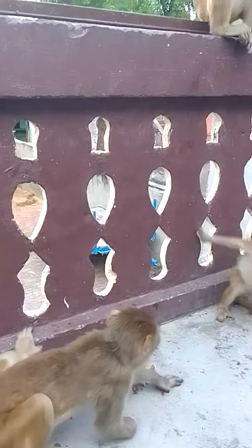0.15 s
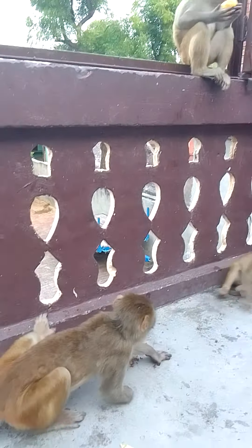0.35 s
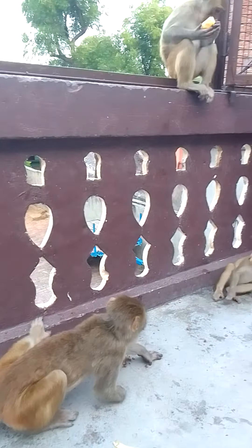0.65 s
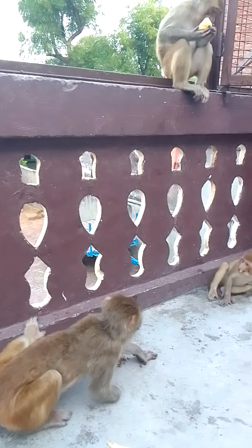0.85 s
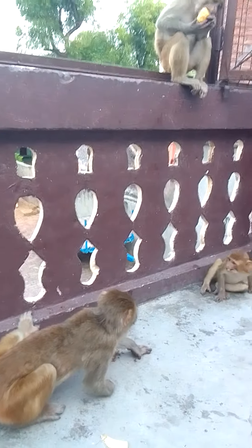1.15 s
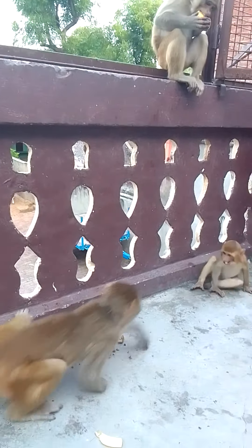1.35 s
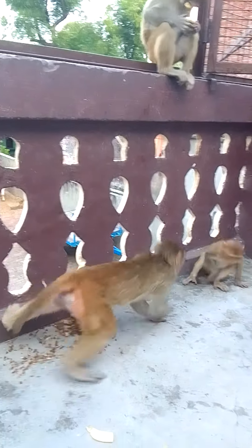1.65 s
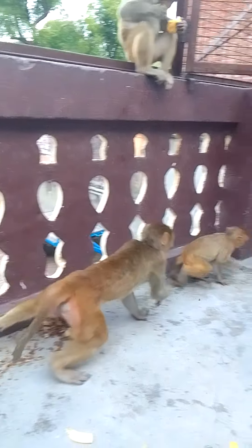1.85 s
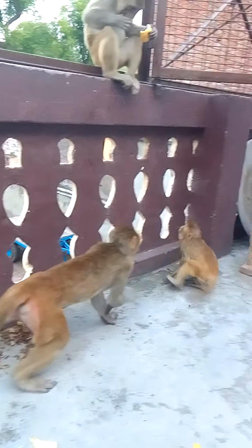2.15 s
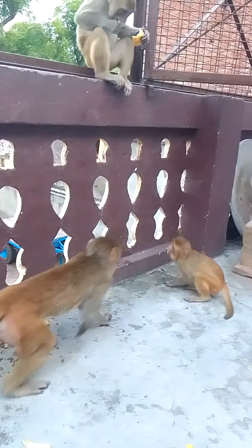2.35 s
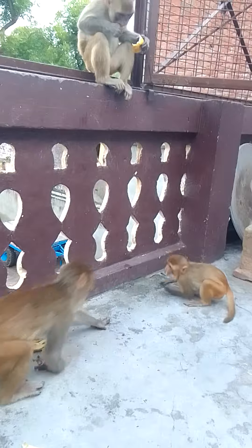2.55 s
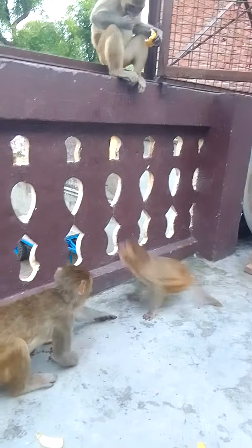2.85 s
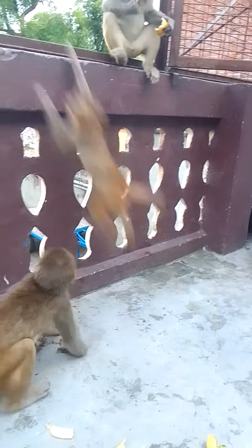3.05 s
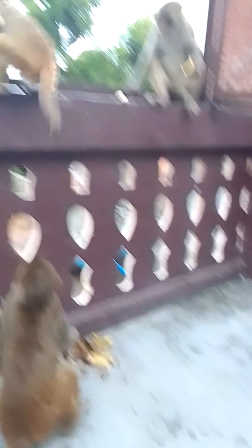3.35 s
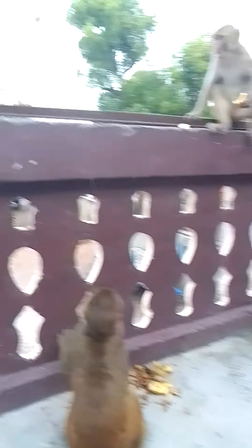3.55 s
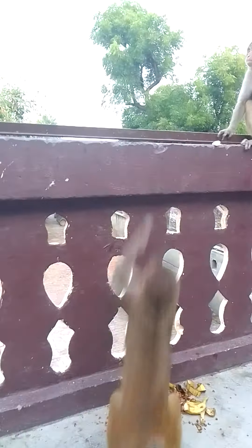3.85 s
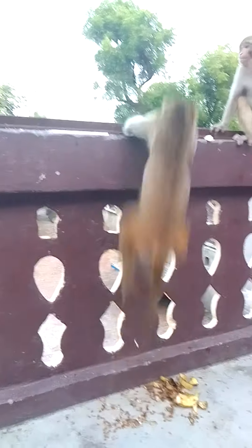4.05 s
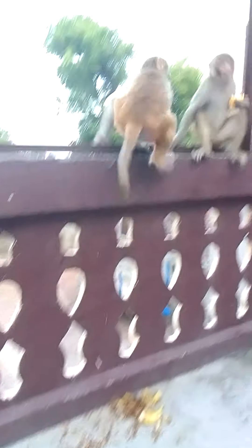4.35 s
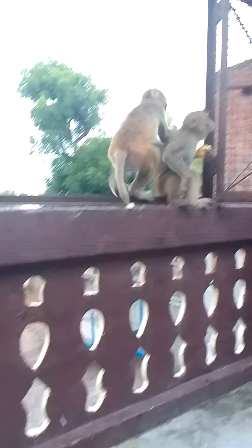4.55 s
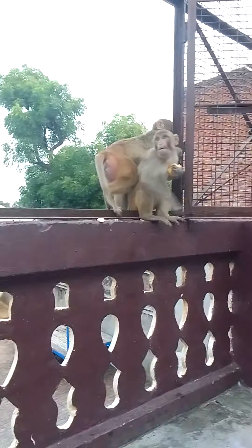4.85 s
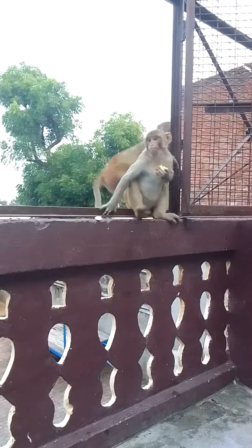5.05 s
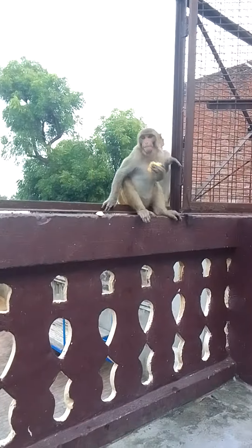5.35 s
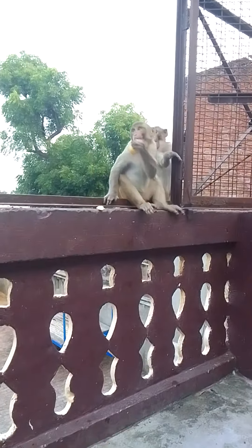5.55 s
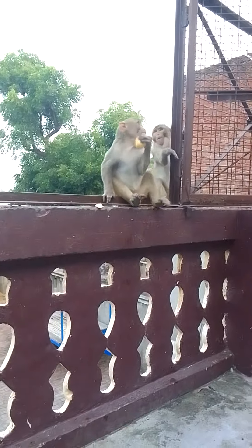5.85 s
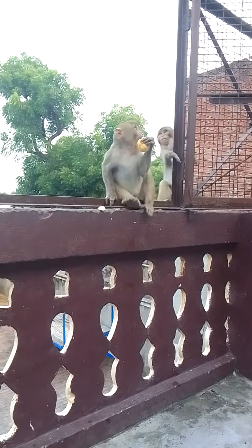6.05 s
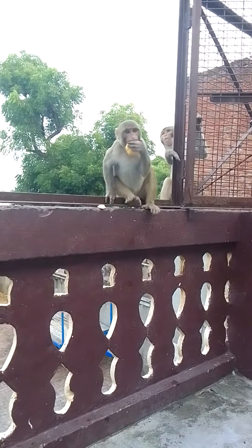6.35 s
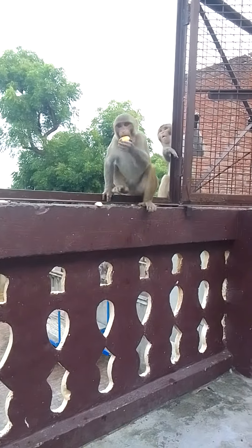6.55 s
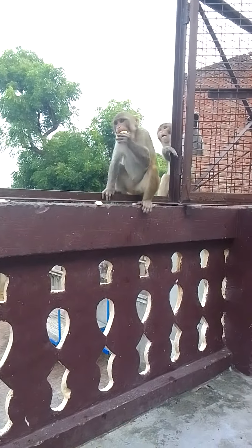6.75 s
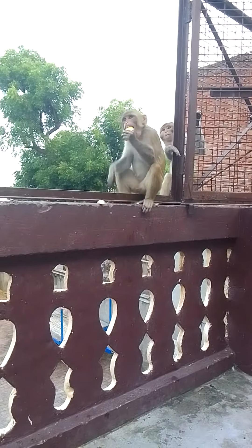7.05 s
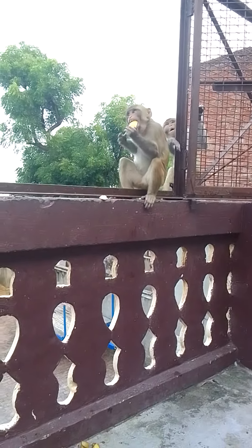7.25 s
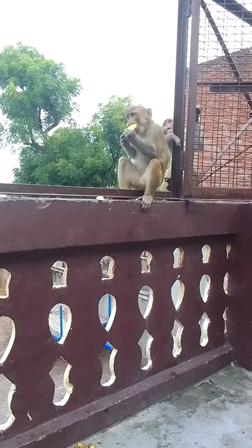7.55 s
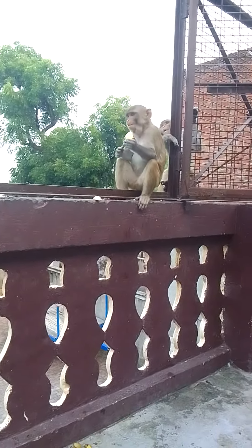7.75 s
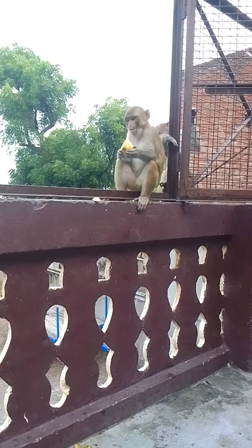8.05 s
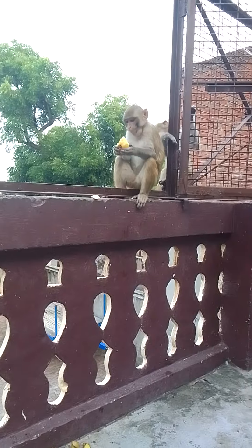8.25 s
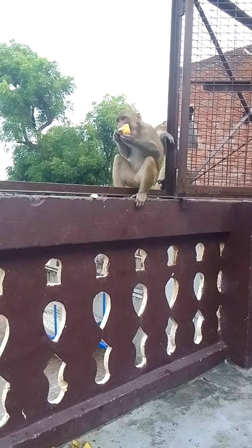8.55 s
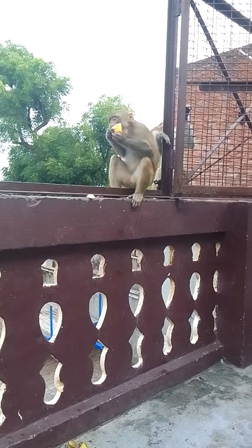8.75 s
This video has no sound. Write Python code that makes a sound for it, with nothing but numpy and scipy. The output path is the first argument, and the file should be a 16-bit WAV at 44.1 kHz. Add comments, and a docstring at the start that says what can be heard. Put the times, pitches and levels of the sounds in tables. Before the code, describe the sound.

On a walled concrete terrace, a faint soft call and tiny dry clicks come first. From about two seconds monkeys give short clear squeaks, then a rapid run of harsh, noisy screeches, with rough low crackle and pops as they scramble and jump. Later squeals come in scattered clusters with gaps, slapping back off the walls. A low grunt and chirps end it abruptly. Handheld microphone, faint uneven hum.

```python
"""Monkey quarrel on a walled terrace

Monkeys quarrel over food on concrete: clear squeaks (overtone stacks) break into harsh screeches
(noise and jumping whistles in five throat modes). A low crackle of one-sided snaps joins in while
they scramble and jump; small ticks, faint notes and a background hum of shaped noise lie around them.
The walls throw calls and ticks back as slaps and a fading tail; the sound stops dead near the end."""
import sys
import numpy as np
from scipy import signal
from scipy.io import wavfile
from scipy.ndimage import uniform_filter1d

SR = 44100
rng = np.random.default_rng(int(sys.argv[2]) if len(sys.argv) > 2 else 0)


def bounce(signal):
    """Save signal as a 16-bit WAV file at the path given by the first command-line argument."""
    frames = np.transpose(np.atleast_2d(signal))
    limited = np.clip(frames, -1, 1)
    pcm = np.round(limited * 32767).astype(np.int16)
    wavfile.write(sys.argv[1], SR, pcm)


N = 392931


def amp(db):
    """Decibels to linear gain."""
    return 10 ** (np.asarray(db) / 20)


def evened(x):
    """Scales a signal to an rms of 1."""
    return x / np.sqrt(np.mean(x ** 2) + 1e-20)


def read(points, hz):
    """Reads a curve of (frequency, value) points along a log frequency axis."""
    point_hz, value = np.transpose(points)
    return np.interp(np.log(hz + 1), np.log(point_hz + 1), value)


def add(mix, start_s, sound):
    """Lays a sound into the mix in place, trimmed at the end."""
    part = mix[round(start_s * SR):][:len(sound)]
    part += sound[:len(part)]


def wander(hz):
    """Smooth random curve of rms 1 that changes about hz times a second."""
    r = np.exp(-2 * np.pi * hz / SR)
    return evened(signal.lfilter([1], np.poly([r, r, r]), rng.standard_normal(N)))


def resonate(x, hz, width_hz):
    """Steep moving resonance: shifts the curve hz to zero, smooths twice, shifts back."""
    turn = np.exp(2j * np.pi * np.cumsum(hz * np.ones(len(x))) / SR)
    r = np.exp(-np.pi * width_hz / SR)
    smoothed = signal.lfilter([1], np.convolve([1, -r], [1, -r]), x / turn)
    return (turn * smoothed).real


def colour(x, points):
    """Causal minimum-phase filter with the given spectrum."""
    log_gain = np.log(amp(read(points, abs(np.fft.fftfreq(4096, 1 / SR)))))
    spectrum = np.exp(np.conj(signal.hilbert(log_gain)))
    return signal.oaconvolve(x, np.fft.ifft(spectrum).real[:2048])[:len(x)]


# spectral balance of the hum before levelling: pitch_hz [Hz], level_db [dB per Hz, relative]
HUM_COLOUR = [(20, -7), (60, 1.5), (150, -3.5), (300, -11), (600, -8.5), (1000, -8), (1400, -5.5),
              (2000, -16), (4000, -26.5), (8000, -34), (16000, -51)]
# levels of the two bands of the hum: time_s [s], rumble_db [dB rms], murmur_db [dB rms]
HUM_LEVELS = [(0.0, -57, -61.5), (0.56, -70, -72), (1.83, -68, -70.5), (2.51, -62.5, -61), (3.95, -59, -64),
              (4.02, -60, -54), (4.53, -66.5, -69.5), (4.85, -67, -54.5), (5.14, -58, -68),
              (6.33, -70, -57), (6.48, -64, -67), (7.31, -79, -74.5), (8.65, -64, -69), (8.75, -75, -85)]
DRONE_HZ, DRONE_WIDTH_HZ, DRONE_DB = 225, 45, -72.5  # a wavering low tone


def hum():
    """Background noise in two bands, low rumble and murmur, that rise and fall over a narrow noise drone."""
    frames, hz = N // 256 + 5, np.fft.rfftfreq(1024, 1 / SR)
    real, imaginary, patches = rng.standard_normal((frames, 513, 3)).T
    patches = uniform_filter1d(patches, 6, 0)  # smooth across frequency
    patches = evened(uniform_filter1d(patches, 16, 1))  # smooth across time
    noise = (real + 1j * imaginary) * amp(read(HUM_COLOUR, hz)[:, None] + 1.6 * patches)
    low = (hz < 350)[:, None]
    rumble, murmur = (evened(signal.istft(noise * band, nperseg=1024, noverlap=768)[1][:N])
                      for band in (low, ~low))
    time_s, rumble_db, murmur_db = np.transpose(HUM_LEVELS)
    t = np.arange(N) / SR
    drone = amp(DRONE_DB) * evened(resonate(rng.standard_normal(N), DRONE_HZ, DRONE_WIDTH_HZ))
    return amp(np.interp(t, time_s, rumble_db)) * rumble + amp(np.interp(t, time_s, murmur_db)) * murmur + drone


# how long each band rings between the walls: pitch_hz [Hz], t60_s [s]
WALL_DECAY = [(500, 0.65), (1300, 1), (3000, 0.5), (6000, 0.57), (9000, 0.46), (14000, 0.41)]
# slaps off the nearest walls: delay_s [s], level_db [dB against the whole tail]
WALL_SLAPS = [(0.019, -3), (.032, -3), (.062, -5.5)]


def terrace(x):
    """A few slaps off near walls over sparse random taps that die band by band; echoes only."""
    taps = np.zeros(SR)
    at = np.arange(400, SR - 20, 20) + rng.integers(0, 20, (SR - 401) // 20)
    taps[at] = rng.choice([-1., 1.], len(at))
    hz, t, bands = signal.stft(taps, SR, nperseg=256)
    tail = signal.istft(bands * amp(-60 * t / read(WALL_DECAY, hz)[:, None]), SR, nperseg=256)[1]
    tail /= np.linalg.norm(tail)
    for delay_s, level_db in WALL_SLAPS:
        add(tail, delay_s, amp([level_db]))
    return signal.fftconvolve(x, tail)[:N]


# small dry clicks: start_s [s], level_db [dB at the start, before trim and low cut], pitch_hz [Hz]
CLICKS = [(.179, -65, 4430), (.3815, -56, 7580), (0.403, -65, 7300), (1.513, -58, 7840),
          (1.577, -67.5, 7810), (1.668, -63.5, 6830), (1.723, -65, 7840), (1.752, -72, 6940),
          (1.7813, -68.5, 4380), (8.306, -69.5, 8510), (8.3287, -66, 8460), (8.397, -72, 4340),
          (8.4194, -70.5, 4070)]


def ticks():
    """Small dry bits (claws, crumbs) click on the concrete: decaying noise with a little ring."""
    out, t = np.zeros(N), np.arange(600) / SR
    for start_s, level_db, pitch_hz in CLICKS:
        burst = rng.standard_normal(600) * amp(-60 * t / 0.055)
        ring = evened(resonate(burst, pitch_hz, 1400))
        add(out, start_s, amp(level_db) * (0.79 * burst + ring / 4))
    return signal.sosfilt(signal.butter(2, 1800, "high", fs=SR, output="sos"), out)


# bursts of crackle: start_s [s], length_s [s], level_db [dB at the peak], peak_place [0-1 of the length]
CRACKLE_BURSTS = [(2.821, 0.13, -30, 0.6), (2.974, 0.1, -30.5, 0.82), (3.488, 0.078, -46, 0),
                  (3.899, 0.1, -33, 0.37), (4.108, 0.052, -39, 0.13)]
# single cracks, loud and faint: start_s [s], peak_db [dB]
SINGLE_CRACKS = [(2.824, -33.5), (2.849, -44), (2.943, -31.5), (2.986, -44.5), (3.198, -25.5), (3.204, -64),
                 (3.429, -30.5), (3.517, -50), (3.861, -28.5), (4.059, -36), (4.074, -29.5), (4.117, -29),
                 (4.183, -37), (4.555, -58)]
# colour of a crack: pitch_hz [Hz], gain_db [dB]
CRACK_COLOUR = [(30, -3), (200, 0), (700, 2), (1300, 7), (2200, -1), (5000, -34.5), (16000, -26)]
CRACKLE_ENDS_DB = -7  # a burst starts and ends this far under its peak


def crackle():
    """Uneven one-sided snaps, dense in bursts; single cracks, loud and faint, alone or within the bursts."""
    t, level = np.arange(N) / SR, np.zeros(N)
    for start_s, length_s, level_db, peak_place in CRACKLE_BURSTS:
        u = (t - start_s) / length_s
        swell_db = np.interp(u, [0, peak_place, 1], [CRACKLE_ENDS_DB, 0, CRACKLE_ENDS_DB])
        level += amp(level_db + swell_db) * (u > 0) * (u < 1)
    snaps = (rng.random(N) < 1100 / SR) * amp(1.7 * np.minimum(rng.exponential(1, N), 3))
    snaps = snaps * amp(2.0 * wander(65.9))
    centred = snaps - uniform_filter1d(snaps, 2000)
    out = -level * evened(colour(centred, CRACK_COLOUR))
    sprays = rng.uniform(0, 1, size=(len(SINGLE_CRACKS), 60))
    for (start_s, peak_db), spray in zip(SINGLE_CRACKS, sprays):
        pop = colour(np.pad(spray ** 4, (0, 2000)), CRACK_COLOUR)
        add(out, start_s, -amp(peak_db) * pop / pop.max())
    return out


# colour of the air in a rough note: pitch_hz [Hz], gain_db [dB, relative]
BREATH_COLOUR = [(500, -42), (1500, -1), (3000, 7.5), (6000, -4), (9000, -16.5), (11000, -28.5),
                 (16000, -47.5)]


def unsteadiness():
    """Three curves that roughen the notes: pitch shake, strength flutter and coloured breath."""
    return wander(490), wander(300), evened(colour(rng.standard_normal(N), BREATH_COLOUR))


# how the mouth weighs the overtones: pitch_hz [Hz], gain_db [dB]
MOUTH_COLOUR = [(600, -22), (900, -3), (1700, 4), (3000, 1.5), (6000, 1), (9000, 1.5), (14000, -28)]
LONG_S = .08  # longer notes glide evenly
EASE = 2.2  # a short glide starts fast and settles: the power of the time left
EDGE_HZ = 15950  # upper limit of overtones and of the whole sound


def sing(note, shake, flutter, breath):
    """Tight folds sing an overtone stack; roughness shakes pitch and strength and lets breath through."""
    start_s, length_s, pitch_hz, glide_oct, level_db, slope_db, rough = note
    u = np.linspace(0, 1, round(length_s * SR))
    first = round(start_s * SR)
    now, rough = slice(first, first + len(u)), np.clip(rough, 0, 1)
    ease = EASE if length_s < LONG_S else 1
    hz = pitch_hz * 2 ** (glide_oct * (.5 ** ease - (1 - u) ** ease))
    turns = np.cumsum(hz * (1 + .085 * rough * shake[now])) / SR
    stack = np.zeros(len(u))
    for k in range(1, 9):
        gain = amp(slope_db * (k - 1) + read(MOUTH_COLOUR, k * hz)) * (k * hz < EDGE_HZ)
        stack += gain * np.sin(2 * np.pi * k * turns)
    voice = stack * (1 + 0.86 * rough * flutter[now]) + 0.87 * rough * breath[now]
    swell = np.tanh(2.2 * np.sin(np.pi * u ** .9) ** 1.5)
    return amp(level_db) * voice * swell


# soft calls, dying call tails, faint held tones and a low grunt under the last call:
# start_s [s], length_s [s], pitch_hz [Hz mid-note], glide_oct [octaves],
# level_db [dB before mouth colour], slope_db [dB per overtone], rough [0-1, clipped]
FAINT_NOTES = [(0.00086, 0.15, 865, -0.2, -54.5, -39, 0.12), (.001, 0.141, 1360, -0.063, -60, -27, 0.18),
               (0.0033, 0.67, 1503, .001, -81.5, -5, 0.18), (.002, 0.132, 2190, -0.12, -71, -5, 0.13),
               (0.00098, 0.097, 3750, 0.024, -72, -3, 0.18), (1.51, 0.32, 2200, 0.092, -84.5, -4, 0.1),
               (2.003, 0.015, 878, 0.086, -49, -6.5, 0.15), (7.715, 0.019, 820, -0.19, -52.5, -13.5, .53),
               (7.7, 0.43, 4100, -0.0085, -87, -32.5, 0.28), (8.235, 0.025, 743, -0.19, -43.5, -9.5, 0.66),
               (8.225, 0.24, 4340, -.02, -80, -7, 0.23), (8.62, 0.19, 285, -0.068, -34.5, -12.5, 0.93)]


def faint_notes(shake, flutter, breath):
    """Soft calls, call tails, held tones and a low grunt, sung with only a trace of breath."""
    out = np.zeros(N)
    for note in FAINT_NOTES:
        add(out, note[0], sing(note, shake, flutter, 0.038 * breath))
    return out


# clear notes: start_s [s], length_s [s], pitch_hz [Hz mid-note], glide_oct [octaves],
# level_db [dB before mouth colour], slope_db [dB per overtone], rough [0-1, clipped]
CLEAR_NOTES = [(2.144, 0.045, 2618, .02, -28.5, -8, 0.25), (2.156, 0.063, 1281, -.9, -35.5, -3.27, .1),
               (2.36, 0.014, 2470, -0.27, -29.5, -25, 0.87), (2.365, 0.041, 1376, -0.13, -29, -9.5, 0.27),
               (2.408, 0.017, 1285, -0.17, -31.5, -47, 0.23), (2.554, 0.019, 2292, .02, -20, -14, 0.03),
               (2.57, 0.024, 1179, -0.25, -29, -4, 0.46), (2.627, .024, 3135, .15, -21.5, -16, .1),
               (2.642, 0.027, 2903, 0.046, -32.5, -1.5, 0.6), (2.688, 0.0085, 3460, -0.0014, -25, -18.5, 0),
               (2.693, 0.037, 3260, -0.91, -30, -13, 1), (2.804, 0.06, 3380, 0.87, -28, -8, 0.24),
               (2.981, 0.12, 4270, .2, -41, -12, 0.15), (3.175, .024, 3400, 0.5, -35, -18, .07),
               (3.188, 0.015, 5370, 0.18, -28.5, -4, 0.2), (3.243, 0.053, 1483, -0.049, -50, -20, .02),
               (3.287, 0.044, 1000, -0.2, -51.5, -5.5, 0.06), (3.464, 0.051, 3630, -.04, -32, -8, 0),
               (3.836, 0.044, 4580, 1.8, -39, -15, 0.83), (4.26, 0.013, 3764, .01, -29, -24.5, 0),
               (4.352, 0.0095, 2370, -1.2, -49, -13, 0.1), (4.535, 0.037, 3850, 0.74, -45, -6, 0.06),
               (4.634, 0.027, 2020, .02, -59, 4.5, 0.2), (4.826, 0.059, 6940, .01, -35, -6.5, .04),
               (4.908, .014, 3353, -0.6, -31.5, -23, 0.77), (4.911, .022, 1734, -1.3, -37, -5.5, 0.65),
               (5.302, 0.022, 2710, 0.73, -36.5, -7, 0.57), (5.306, .06, 1420, 0.15, -45.5, -18, 0.54),
               (5.648, 0.029, 7740, .01, -40, -20, 0.3), (5.677, .014, 2510, -1.2, -51.5, -12, .2),
               (5.886, 0.039, 2750, 0.32, -38.5, -33.5, 0.04), (5.9, 0.022, 2907, -.05, -24.5, -15, 0.02),
               (5.904, 0.027, 1817, -1.02, -44.5, 0, 0.5), (5.934, 0.023, 2976, -0.068, -35.5, -21.5, 0.31),
               (5.974, 0.038, 5750, 0.19, -33.5, -8, 0.34), (6.025, 0.019, 5750, -1.13, -35.5, -1, 0.3),
               (6.042, 0.019, 6260, -0.14, -28.5, -9.5, 0.1), (6.057, 0.026, 3020, -0.55, -28.5, -9, 0.62),
               (6.067, .03, 1647, -.8, -35.5, -8, 0.42), (6.272, 0.032, 2897, 0.17, -23, -17.5, 0.09),
               (6.287, 0.027, 2988, 0.19, -21.5, -13, .31), (6.322, 0.016, 2763, .1, -26.5, -3, 0.34),
               (6.331, 0.019, 3153, 0.32, -25.5, -29, 0.4), (6.347, .0089, 3016, .04, -17.5, -18, .25),
               (6.401, .028, 2994, .07, -30.5, -23, 0.35), (6.415, 0.03, 1452, -1.47, -40, -4, 0.49),
               (6.686, 0.051, 1424, -0.28, -46.5, -5.5, 1.06),
               (6.821, 0.017, 2460, -0.64, -36.5, -19, 0.55),
               (6.829, 0.035, 1470, 0.024, -39.5, -5.5, 0.69), (7.001, 0.043, 3340, 0.53, -33, -21, 0.1),
               (7.199, 0.011, 7000, -.23, -48.5, 3, .02), (7.215, 0.13, 6290, -.38, -43, -13, 0.06),
               (8.632, 0.0099, 1468, 0.067, -30, -24, 0.03), (8.66, 0.011, 1410, -0.15, -32, -26, 0.08),
               (8.669, 0.026, 1494, 0.21, -21.5, -26, 0.13), (8.691, 0.015, 1485, .01, -20.5, -28, 0.05),
               (8.7, 0.026, 1186, .05, -34, -4.5, 0.2)]


def squeaks(shake, flutter, breath):
    """Clear notes sung with full breath."""
    out = np.zeros(N)
    for note in CLEAR_NOTES:
        add(out, note[0], sing(note, shake, flutter, breath))
    return out


# throat path, one list a scream: time_s [s], main_db [dB, main mode], main_hz [Hz],
# next_hz [Hz, next mode], upper_db [dB, reference for all other modes]
SCREAM_PATHS = [
    [(2.808, -32, 3470, 5490, -45.5), (2.826, -24.5, 3460, 5600, -31.5), (2.892, -41.5, 3579, 5920, -32.5),
     (2.948, -45, 3860, 5560, -36.5), (3.054, -24, 4028, 5330, -33), (3.08, -27.5, 4080, 5360, -39.5),
     (3.085, -36.5, 4060, 5240, -37)],
    [(3.172, -43.5, 3253, 5282, -52.5), (3.186, -34, 3246, 5290, -44.5), (3.192, -40, 3360, 5280, -29.5),
     (3.258, -61.5, 3331, 5610, -42.5), (3.368, -47, 4140, 5660, -39), (3.444, -47, 3895, 5500, -35.5),
     (3.45, -48.5, 3874, 5490, -39)],
    [(3.462, -39, 3677, 5170, -44.5), (3.468, -28.5, 3713, 5170, -43), (3.48, -25.5, 3690, 5170, -36.5),
     (3.558, -37, 3920, 5185, -34), (3.584, -79, 3930, 5450, -46), (3.62, -42, 3867, 5590, -41),
     (3.67, -54, 3948, 5600, -52)],
    [(3.832, -52, 3530, 5170, -64), (3.844, -45.5, 3602, 5210, -41), (3.856, -46, 4000, 5300, -36.5),
     (3.912, -44, 3910, 5840, -34.5), (4.054, -53.5, 3840, 6595, -38.5), (4.07, -42, 4050, 6300, -34.5),
     (4.077, -57, 4010, 6380, -41.5)],
    [(4.09, -42, 3810, 5880, -39), (4.134, -40.5, 4140, 5790, -33.5), (4.176, -44.5, 4170, 5730, -38),
     (4.196, -32.5, 4290, 5640, -34), (4.246, -51, 3850, 5630, -46), (4.258, -38, 3800, 5630, -37)],
    [(4.272, -46, 3730, 5600, -38), (4.278, -52, 3740, 5560, -43.5), (4.342, -52, 3760, 6480, -54.5),
     (4.35, -49, 3740, 6580, -52)],
    [(4.538, -48.5, 4040, 5950, -56.5), (4.552, -35.5, 4090, 5870, -38.5), (4.594, -48, 4040, 6080, -42.5),
     (4.633, -61, 4020, 6190, -50)],
    [(4.652, -53, 3800, 6270, -33.5), (4.678, -36, 3790, 6220, -31.5), (4.692, -47.5, 3928, 6210, -32.5),
     (4.788, -44, 3822, 6300, -32.5), (4.842, -45, 3787, 6840, -31), (4.878, -62, 3800, 6920, -42)],
    [(5.337, -52, 3728, 5770, -32), (5.345, -44, 3790, 5740, -39), (5.439, -50.5, 3960, 6240, -43),
     (5.495, -47.5, 4180, 6220, -40.5), (5.537, -47.5, 3854, 6010, -36.5), (5.665, -50.5, 3927, 6370, -41),
     (5.72, -55.5, 3680, 6340, -62)],
    [(7.005, -39.5, 3510, 5940, -55), (7.013, -30, 3520, 5900, -38.5), (7.027, -29.5, 3540, 5800, -43),
     (7.042, -45, 3540, 5760, -38)],
    [(7.054, -34, 3660, 6010, -32), (7.06, -57, 3650, 5950, -41.5), (7.1, -44, 3873, 5990, -39),
     (7.182, -59, 4040, 6390, -48), (7.235, -68, 3890, 6730, -46)],
    [(8.612, -61, 4100, 5210, -63), (8.618, -56, 4200, 5180, -57.5), (8.658, -60, 3850, 5380, -61),
     (8.664, -55, 3644, 5350, -53.5), (8.714, -59, 3585, 5760, -48), (8.796, -75, 3720, 5980, -65),
     (8.8, -64, 3555, 5990, -63)],
]
# colour of each scream against upper_db: next_db [dB], top_db [dB], low_db [dB], air_db [dB, thin air above]
SCREAM_COLOURS = [(-2, -2.5, -17, -9.5), (-10.5, -9.5, -22.5, -8.5), (-0.5, -6, -23.5, -12.5),
                  (-8, -2.5, -18.5, -10), (-0.5, -5.5, -30, -7.5), (1, -8, -29, -7), (0, -0.5, -28, -14),
                  (-4.5, -12, -32, -19.5), (-2, -5.5, -16.5, -11.5), (-4, -2, -37, -30),
                  (1.5, -4, -16.5, -12), (2, -25, 16, -37)]
TOP_HZ, LOW_HZ, AIR_HZ = 8460, 1379, 14100
WIDTHS_HZ = [1090, 1360, 1500, 560.4, 7200]  # each smoothing pass: main, next, top, low, air
EDGE_S = 0.0095  # a scream opens and shuts this quickly
JUMPS_PER_S = 45  # average rate at which a whistle breaks to another pitch


def screams():
    """Folds slap without order: five throat modes hold noise and a breaking whistle, weak in the widest."""
    t = np.arange(N) / SR
    time_s, *columns = np.concatenate(SCREAM_PATHS).T
    main_db, main_hz, next_hz, upper_db = (np.interp(t, time_s, column) for column in columns)
    gates = np.array([np.clip(.5 + np.minimum(t - rows[0][0], rows[-1][0] - t) / EDGE_S, 0, 1)
                      for rows in SCREAM_PATHS])
    levels_db = [main_db, *(upper_db + np.transpose(SCREAM_COLOURS) @ (gates > 0))]
    ragged, throat = amp(0.88 * wander(500) + 0.41 * wander(50)), np.zeros(N)
    modes_hz = [main_hz, next_hz, TOP_HZ, LOW_HZ, AIR_HZ]
    for hz, width_hz, mode_db in zip(modes_hz, WIDTHS_HZ, levels_db):
        hiss = evened(resonate(rng.standard_normal(N), hz * (1 + 0.075 * wander(37)), width_hz))
        # index of the latest break, held until the next one
        jump = np.maximum.accumulate(np.arange(N) * (rng.random(N) < JUMPS_PER_S / SR))
        held_hz = hz + width_hz * .3 * wander(200)[jump]
        lurch_hz = held_hz + min(width_hz, 1500) * .07 * wander(500)
        whistle = np.sin(2 * np.pi * np.cumsum(lurch_hz) / SR) * amp(3.5 * wander(70))
        blend = evened(hiss + .9 * whistle * min(1, 3000 / width_hz))
        throat += amp(mode_db + 1.1 * wander(60)) * blend
    return gates.sum(0) * ragged * throat


def scene():
    """Calls, faint notes and ticks with their echoes, over the crackle and the hum."""
    curves = unsteadiness()
    faint = faint_notes(*curves)
    calls = screams() + squeaks(*curves)
    low_cut = signal.butter(4, 850, "high", fs=SR, output="sos")  # small mouths give no bass
    clear = signal.sosfilt(low_cut, calls) + ticks()
    echoes = terrace(amp(-11.5) * clear + amp(-3.5) * faint)
    return (clear + faint + echoes + crackle() + hum())[None]


END_S = 8.8  # silent from here on


def record(dry):
    """Cuts the sound off with a 1.8 ms fade, then limits the band."""
    kept = dry * np.clip((END_S - np.arange(N) / SR) / 0.0018, 0, 1)
    low_pass = signal.firwin(511, EDGE_HZ, window=("kaiser", 9), fs=SR)
    return signal.oaconvolve(kept, low_pass[None], "same")


dry = scene()
out = record(dry)
bounce(out)
```